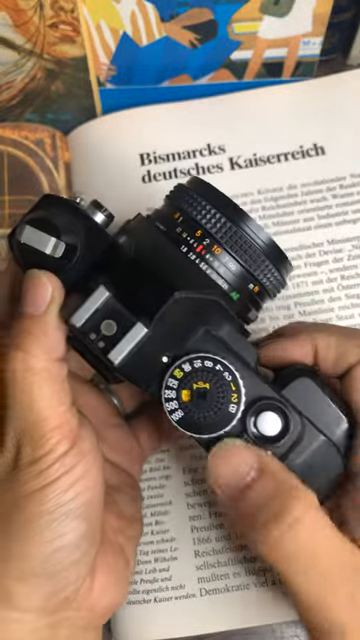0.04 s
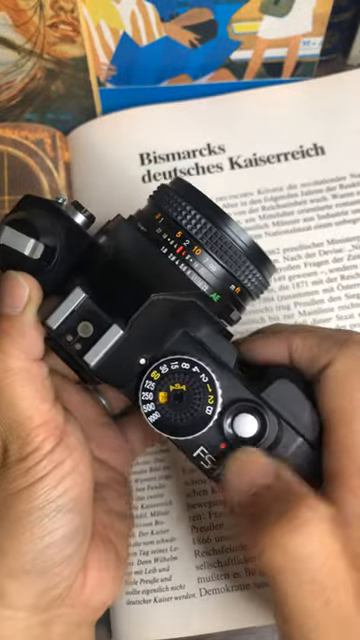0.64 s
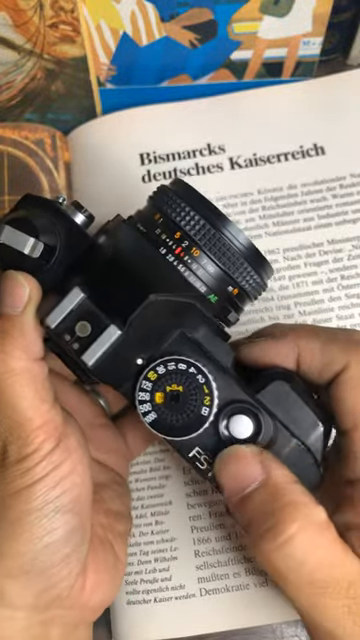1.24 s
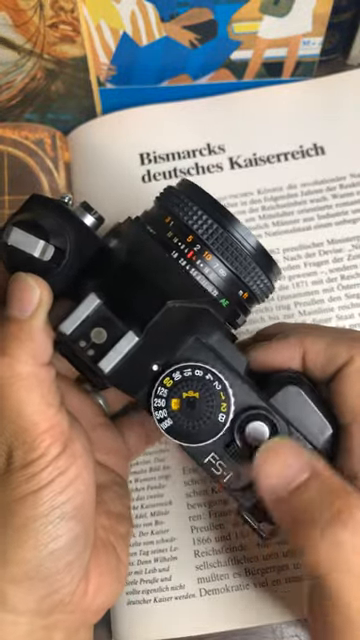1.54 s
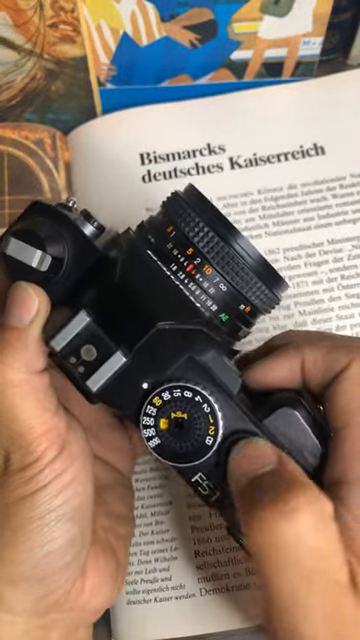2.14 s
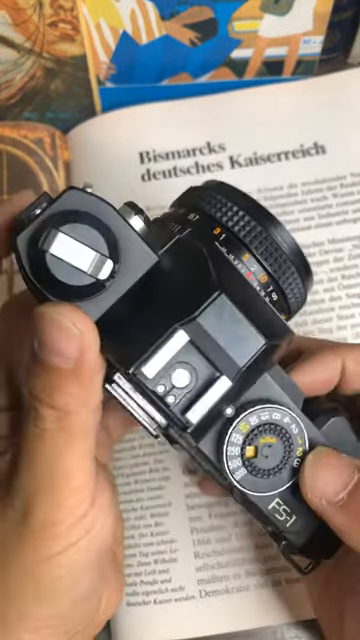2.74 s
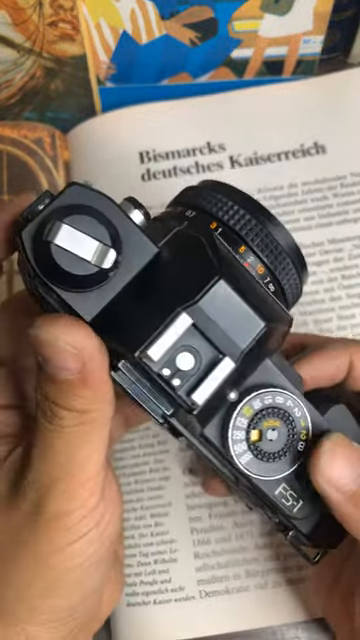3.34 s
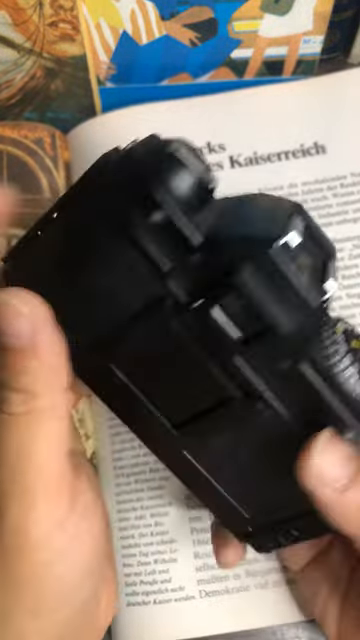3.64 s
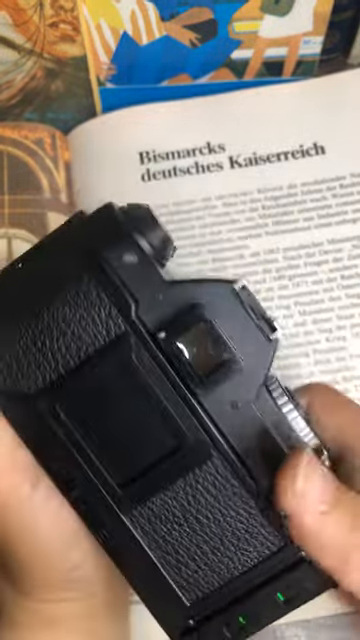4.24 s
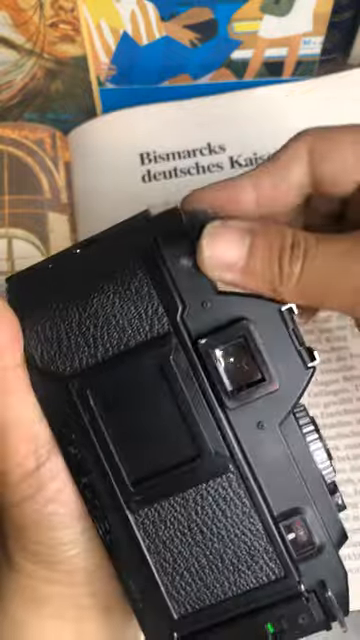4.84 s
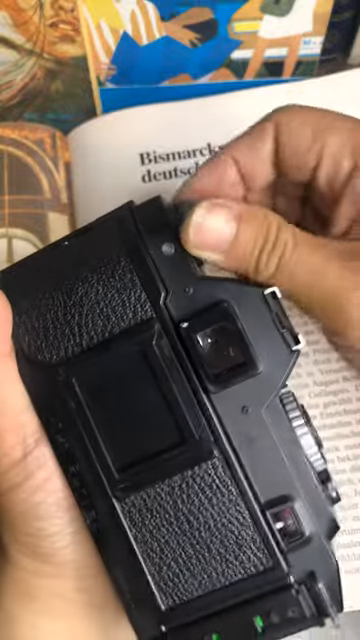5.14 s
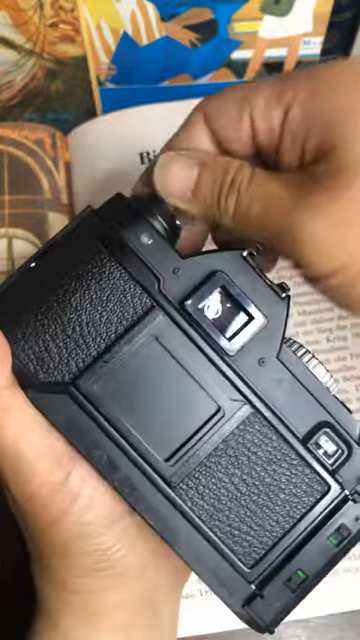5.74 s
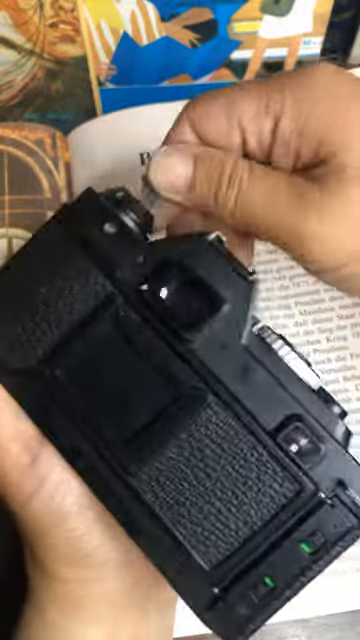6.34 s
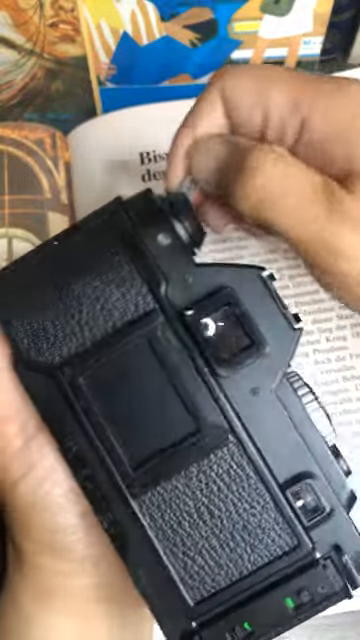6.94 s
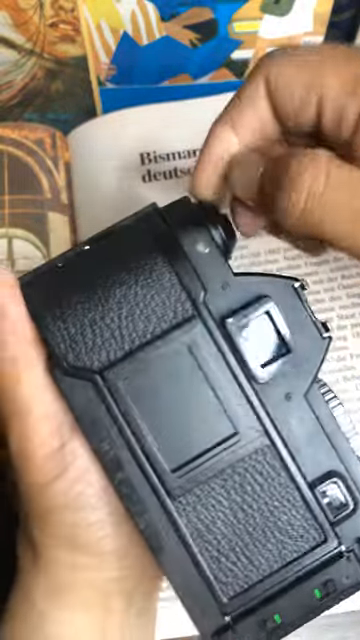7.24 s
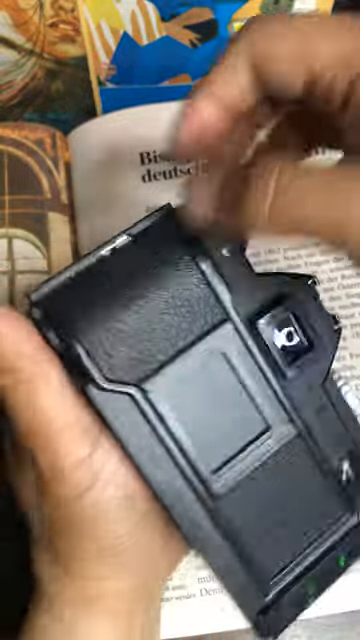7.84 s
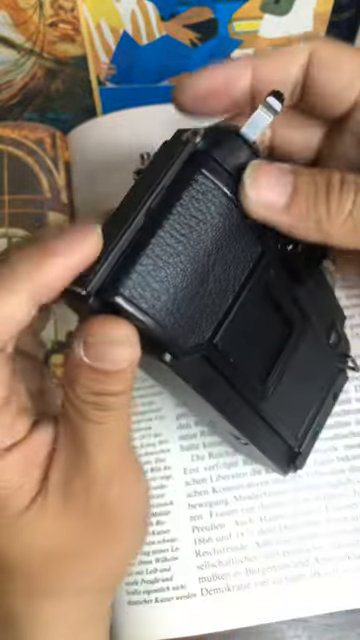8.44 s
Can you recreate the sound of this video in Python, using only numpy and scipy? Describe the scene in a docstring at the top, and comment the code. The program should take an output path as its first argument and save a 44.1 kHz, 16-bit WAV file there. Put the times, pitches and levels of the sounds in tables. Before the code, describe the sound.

Two shutter clacks, each with a short motor winder whir, followed by light clicks and finger rubs on a film camera in a quiet room.

```python
"""Small clicks and finger rubs, close to one microphone: a motorised film camera is being handled over a
book in a small room. The shutter fires twice; each time mirror and blades clack, and the geared winder
grinds under load, runs free and stops. Then the rewind knob snaps up and its crank is fiddled with.
Mains hum and faint room noise lie underneath."""
import sys
import numpy as np
from scipy import signal
from scipy.fft import rfft, irfft, next_fast_len
from scipy.io import wavfile
from scipy.ndimage import uniform_filter1d, map_coordinates

SR = 44100
rng = np.random.default_rng(int(sys.argv[2]) if len(sys.argv) > 2 else 0)


def wav_record(signal):
    """Record a signal, one row per channel, as 16-bit PCM in the file named by sys.argv[1]."""
    frames = np.transpose(np.atleast_2d(signal))
    bounded = np.clip(frames, -1, 1)
    # unit amplitude maps onto the largest positive 16-bit level
    quanta = np.round(bounded * 32767).astype(np.int16)
    wavfile.write(sys.argv[1], SR, quanta)


N = 377937
LEAD = 128  # samples of silence ahead of each contact

# The two shots. Each row: release in seconds, extra whine at standstill in dB, extra rattle brightness
# at full speed in dB.
RELEASES = [(1.7895, -6, -1), (2.9739, 5, 1.5)]
# Mirror, blades, cams and end stop striking. Each row: seconds after release, then relative level,
# knock and brightness in dB.
SHUTTER_BLOWS = [(-.014, -40, -18.5, -1.5), (0, -20.5, -23, 3.5), (.017, -25, -19.5, 8),
                 (0.0231, -18.5, -12.5, -1.5), (0.0622, -30, -14.5, 4.5), (0.065, -27, -13, -2),
                 (0.0734, -24.5, -14, 1), (.089, -27.5, -10.5, 1.5), (.1086, -32.5, -6, -13),
                 (0.1516, -28, -15, 0.5), (.156, -26.5, -16.5, 3), (0.212, -26.5, -17, 7),
                 (.2214, -21, -24.5, 3.5), (0.2364, -24.5, -23.5, 5), (0.3109, -24, -17, -0.5),
                 (.329, -34.5, -5, 2), (0.5285, -26, -18, 1.5)]
# Mirror box and shutter frame ringing. Each row: pitch in Hz, width in Hz, gain in dB.
FRAME_MODES = [(404, 22, 0), (1119, 89, -4), (1556, 95, -6), (2070, 120, -2.5), (3370, 230, -7),
               (4360, 330, -4), (7900, 160, -3), (10200, 88, -6.5), (13110, 200, -12)]
def shutter(gain_db, t60):
    """Mirror, blades and cams slam home inside their frame, in the same order at every release."""
    out = np.zeros(N)
    for release, *_ in RELEASES:
        for delay, db, knock_db, bright_db in SHUTTER_BLOWS:
            clack = contact(FRAME_MODES, db, knock_db, bright_db, t60, crack=0.38, crack_t60=0.0054,
                            rise=0.022, shape=1.17, knock_life=1.7, low_hz=380, softness=0.32)
            add(out, release + delay - LEAD / SR, clack)
    return amp(gain_db) * out


# The winder starts, slows as it cocks the springs, runs free and is braked. Each row: seconds after
# release, tooth rate in Hz, then relative whine, rattle and rattle brightness in dB.
WINDER_RUN = [(.011, 900.3, -62.5, -43.5, 0), (.052, 1196, -61, -49.5, -6), (.1, 1901, -58, -40.5, -9),
              (.139, 2386, -57, -42, -11), (.171, 2459, -47.5, -37, 3), (.221, 2034, -32.5, -35, -0.5),
              (.266, 1849, -34, -36.5, 2.5), (.316, 2019, -43.5, -34.5, 3), (.346, 2150, -45, -44.5, -15),
              (.395, 2454, -35.5, -46, -1.5), (.445, 2669, -32.5, -42, 5), (.527, 2760, -36, -48, 3.5),
              (.556, 1698, -45, -41.5, -23)]
# Partials of the whine. Each row: multiple of the tooth rate, relative level in dB.
TOOTH_PARTIALS = [(.5, -4), (1, 0), (2, -4), (3, -5)]
# The gear housing ringing. Each row: pitch in Hz, width in Hz, gain in dB.
HOUSING_MODES = [(2070, 110, -4.5), (2790, 250, 0.5), (4690, 500, 0.5), (5590, 400, -0.5), (7070, 800, 0.5)]
# Wheels and plates of the gear train ringing. Each row: pitch in Hz, width in Hz, gain in dB.
WHEEL_MODES = [(1928, 86, 1.5), (2500, 120, -6.5), (3553, 300, 1.5), (4530, 160, -7), (6630, 260, -6),
               (12900, 360, -0.5)]
# Colour of the gear rattle. Each row: frequency in Hz, relative level in dB.
RATTLE_SPECTRUM = [(200, -19.5), (600, -11.5), (850, -1.5), (1400, -0.5), (4000, -1), (10000, -3),
                   (16000, -5.5)]
def winder(jitter, throb, flutter_db, rattle_throb, whir_db, whine_gain_db, rattle_gain_db):
    """Meshing teeth whine through the housing, slower under load; the gears rattle with every turn."""
    out = np.zeros(N)
    times, *columns = np.transpose(WINDER_RUN)
    t = np.arange(times[0], times[-1], 1 / SR)
    n = len(t)
    tooth_hz, whine_db, rattle_db, bright_db = [np.interp(t, times, column) for column in columns]
    slack = (tooth_hz / tooth_hz.max()) ** 2  # unloaded gears wander in their backlash
    housing = lambda hz: sum(resonances([mode], hz) ** 2 for mode in HOUSING_MODES) / (1 + hz / 3000)
    wheels = lambda hz: amp(along(RATTLE_SPECTRUM, hz)) * (1 + resonances(WHEEL_MODES, hz))
    for release, load_db, free_bright_db in RELEASES:
        phase = 2 * np.pi * np.cumsum(tooth_hz * (1 + jitter * slack * wobble(1400, n))) / SR
        turn = np.sin(phase / 13)  # a pinion of thirteen teeth
        whine = np.zeros(n)
        for k, db in TOOTH_PARTIALS:  # each swells as it sweeps through a resonance
            boost = np.abs(resonances(HOUSING_MODES, k * tooth_hz))
            whine += amp(db + flutter_db * wobble(300, n)) * boost * np.sin(k * phase)
        whir = unit(filtered(rng.standard_normal(n), housing))  # uneven strikes ring the housing
        gears = (amp(whine_gain_db) * whine + amp(whir_db) * slack * whir) * (1 + throb * turn)
        gears *= amp(whine_db + load_db * (1 - slack))
        impacts = grains(n, rate=2400, spread_db=-0.5, smooth=0.7) * (1 + rattle_throb * turn)
        rattle = brighten(unit(filtered(impacts, wheels)), bright_db + free_bright_db * slack)
        add(out, release + times[0], gears + amp(rattle_db + rattle_gain_db) * rattle)
    return out


# Clicks under the fingers, close to the microphone. Each row: start in seconds, part, relative level
# in dB, brightness in dB.
CLICKS = [(.334, "body", -49, -4.5), (0.375, "lock", -34.5, 13), (.6285, "switch", -53.5, -6),
          (0.9543, "catch", -57, -11), (1.155, "switch", -49.5, -11), (1.2336, "switch", -33.5, -4),
          (1.5641, "switch", -45, -21), (2.934, "crank", -50, -13), (3.612, "switch", -47, -10.5),
          (3.688, "grip", -44.5, -2.5), (4.0525, "body", -33, -10.5), (4.0694, "body", -39.5, -23),
          (4.3083, "body", -40, -6), (4.6155, "crank", -48, -9), (4.7416, "crank", -52, -8),
          (4.8387, "hinge", -54, -5.5), (4.9557, "crank", -41.5, 0), (5.053, "crank", -45.5, -5.5),
          (5.2231, "catch", -52.5, -14.5), (5.6771, "knob", -20.5, 4.5), (5.761, "switch", -43, -8),
          (5.866, "shaft", -38.5, -8), (6.0042, "grip", -51, -8), (6.0309, "crank", -49, -11),
          (6.2471, "crank", -42, -7.5), (6.3057, "grip", -47.5, -3.5), (6.4004, "hinge", -50, -2.5),
          (6.465, "crank", -47, -18), (6.9282, "hinge", -39, -7), (6.945, "grip", -51, -13),
          (7.1701, "catch", -41, -0.5), (7.4675, "crank", -45, -30), (7.6975, "crank", -37, -1),
          (7.7273, "hinge", -49, 2), (7.7803, "crank", -45, -6.5), (7.9316, "crank", -38.5, -13),
          (7.981, "crank", -32.5, -17.5), (7.9961, "grip", -45, -3), (8.0455, "grip", -42.5, -8),
          (8.1163, "grip", -41.5, -5.5), (8.2198, "grip", -45.5, 1)]
# The parts that click. Each entry: ring in Hz, decay (t60) in seconds, knock in dB.
CLICKING_PARTS = {"lock": (12700, .0094, -12.5), "knob": (5600, .012, -23), "switch": (4130, .02, -15),
                  "body": (4000, .042, -11), "grip": (2950, .03, -7), "catch": (2520, .023, -18),
                  "shaft": (4620, .07, -13), "crank": (1920, .023, -12), "hinge": (1570, .04, -1)}
# The camera shell ringing. Each row: pitch in Hz, width in Hz, gain in dB.
SHELL_MODES = [(805, 230, -6), (1110, 76, -4), (1989, 170, 0), (2480, 99, 2.5), (4040, 760, -6.5),
               (6760, 3300, -2.5)]
def controls(gain_db, ring_db, ring_width, crack):
    """Each touched part adds its own ring to that of the shell; bright clicks crack hardest."""
    out = np.zeros(N)
    for start, part, db, bright_db in CLICKS:
        ring_hz, t60, knock_db = CLICKING_PARTS[part]
        modes = SHELL_MODES + [(ring_hz, ring_width * ring_hz, ring_db)]
        click = contact(modes, db, knock_db, bright_db, t60, crack=crack * amp(bright_db / 2),
                        crack_t60=0.0045, rise=0.017, shape=0.97, knock_life=1.0, low_hz=546,
                        softness=0.59)
        add(out, start - LEAD / SR, click)
    return amp(gain_db) * out


def contact(modes, db, knock_db, bright_db, t60, crack, crack_t60, rise, shape, knock_life, low_hz,
            softness):
    """Small parts meet with a sharp crack and a brief chatter, coloured by the modes of the body."""
    t = np.maximum(np.arange(-LEAD, SR // 12) / SR, 0)
    onset = 1 - np.exp(-t / (rise * t60))  # long contacts also build up slowly
    chatter = lambda life: onset * np.exp(-(np.log(1000) * t / life) ** shape)
    snap = crack * amp(-60 * t / crack_t60) * (t > 0)
    tilt = lambda hz: amp(softness * min(bright_db, 0) * np.log2(1 + hz / 2000))  # soft means dull

    def struck(envelope, edges_hz):
        ringing = filtered(burst(envelope), lambda hz: tilt(hz) * (1 + resonances(modes, hz)))
        return unit(bandpass(ringing, edges_hz))

    knock = struck(chatter(knock_life * t60), [low_hz, 1300])
    clack = struck(chatter(t60) + snap / 2, [1400, 6500])
    tick = struck(chatter(t60) + snap, [6600, 16500])
    return amp(db) * (amp(knock_db) * knock + clack + amp(bright_db) * tick)


# The rewind shaft and its spring ringing. Each row: pitch in Hz, width in Hz, gain in dB.
SHAFT_MODES = [(2100, 500, -6), (4150, 390, 0), (5577, 110, 4.5), (7014, 500, -4.5), (8689, 600, -3),
               (10400, 820, -4.5), (13290, 2000, -10.5)]
def rewind_knob(start, level_db, t60):
    """The knob snaps up, and its sprung shaft buzzes briefly against the stop."""
    out = np.zeros(N)
    t = np.arange(SR // 4) / SR
    buzz = unit(filtered(rng.standard_normal(len(t)), lambda hz: resonances(SHAFT_MODES, hz)))
    add(out, start, amp(level_db - 60 * t / t60) * buzz)
    return out


# Fingers sliding on the body. Each row: centre and half length in seconds, level and brightness in dB.
SLIDES = [(0.086, 0.017, -58, 7.5), (0.221, .025, -67.5, 5.5), (0.599, .03, -63.5, -1),
          (1.014, .015, -63, -6.5), (1.65, 0.015, -59.5, -24), (3.856, 0.07, -63.5, 1.5),
          (3.98, 0.056, -58.5, 5.5), (4.082, 0.031, -53.5, 3.5), (4.164, .03, -63, -3),
          (4.3, 0.026, -54, -2.5), (4.501, 0.083, -64, 3), (7.224, 0.018, -61.5, -4),
          (8.075, 0.053, -51.5, 3.5), (8.177, .05, -54.5, -0.5)]
# Colour of skin on leatherette. Each row: frequency in Hz, relative level in dB.
SKIN_SPECTRUM = [(300, -21.5), (900, 1), (2000, 1.5), (4500, -0.5), (8000, -2), (15000, -5)]
# The hollow camera back ringing. Each row: pitch in Hz, width in Hz, gain in dB.
BACK_MODES = [(1960, 250, -2), (3070, 360, 4), (4130, 150, -2), (5000, 360, -4), (5896, 360, -4.5)]
def fingers(slip_lag_s, slip_half_s, slip_db):
    """Skin catches and slips on the leatherette, in slides and a little at every click."""
    out = np.zeros(N)
    click_slips = [(start + slip_lag_s, slip_half_s, slip_db, 0) for start, *_ in CLICKS]
    for centre, half, db, bright_db in SLIDES + click_slips:
        t = np.arange(-2 * half, 2 * half, 1 / SR)
        catches = grains(len(t), rate=900, spread_db=8, smooth=0.81)
        squeak = [(rng.uniform(2600, 6000), 350, 1)]  # each grip squeaks at its own pitch
        colour = lambda hz: amp(along(SKIN_SPECTRUM, hz)) * (0.87 + resonances(BACK_MODES + squeak, hz))
        rub = brighten(unit(filtered(catches, colour)), bright_db)
        add(out, centre + t[0], amp(db) * swell(t, half) * rub)
    return out


# The body shifting in the hands. Each row: centre and half length in seconds, level in dB, pitch in Hz.
GRIP_SHIFTS = [(.5, 0.17, -62, 133), (2.75, 0.24, -70.5, 135), (4.17, .05, -52.5, 96),
               (4.3, 0.037, -54, 70.6), (8.07, .06, -56.5, 147), (8.059, 0.039, -62, 280),
               (8.08, 0.051, -56, 510)]
def bumps():
    """The body thuds softly in the grip."""
    out = np.zeros(N)
    for centre, half, db, pitch in GRIP_SHIFTS:
        t = np.arange(-2 * half, 2 * half, 1 / SR)
        mode = [(pitch, .6 * pitch, 0)]
        thud = unit(filtered(rng.standard_normal(len(t)), lambda hz: resonances(mode, hz) ** 2))
        add(out, centre + t[0], amp(db) * swell(t, half) * thud)
    return out


# The small room dying away. Each row: frequency in Hz, decay (t60) in seconds.
ROOM_DECAY = [(400, 0.13), (1300, 0.34), (3500, 0.16), (9000, 0.18), (15000, 0.075)]
def room(x, near_db, wall_db, wall_delay):
    """Scatter from hands and desk reaches the microphone at once; the walls answer a little later."""
    hz, frame_s, spectrum = signal.stft(rng.standard_normal(SR // 2), SR, nperseg=256)
    decay = amp(-60 * frame_s / along(ROOM_DECAY, hz)[:, None])
    _, walls = signal.istft(spectrum * decay, SR, nperseg=256)
    t = np.arange(len(walls)) / SR
    walls *= np.clip((t - wall_delay) / 0.00083, 0, 1)
    near = rng.standard_normal(len(t)) * amp(-60 * t / 0.078) * (t > .002)
    answer = amp(wall_db) * walls / np.linalg.norm(walls) + amp(near_db) * near / np.linalg.norm(near)
    return x + signal.fftconvolve(x, answer)[:N]


# Mains hum in the room. Each row: frequency in Hz, relative level in dB.
HUM_TONES = [(59.2, -62), (118.4, -62.5), (290.7, -77), (344.5, -73.5), (699.8, -84.5), (748.3, -72.5),
             (877.5, -82.5)]
# Colour of the room noise. Each row: frequency in Hz, relative level in dB.
AIR_SPECTRUM = [(25, -34), (42, -21), (60, -12.5), (84, -18.5), (105, -8.5), (128, -6.5), (200, -13),
                (300, -17), (600, -23), (800, -21), (2160, -32), (6000, -39.5), (12500, -45),
                (16000, -41.5)]
def room_tone(air_db, hum_db, waver_db):
    """An appliance hums, slightly unsteady, over dull room noise."""
    t = np.arange(N) / SR
    hum = np.zeros(N)
    for hz, db in HUM_TONES:
        hum += amp(db + waver_db * wobble(6, N)) * np.sin(2 * np.pi * hz * t + .25 * wobble(5, N))
    air = unit(filtered(rng.standard_normal(N), lambda hz: amp(along(AIR_SPECTRUM, hz))))
    return amp(hum_db) * hum + amp(air_db) * air


def amp(db):
    """Decibels to gain."""
    return 10 ** (np.asarray(db) / 20)


def unit(x):
    """Scale to rms 1."""
    return x / np.sqrt(np.mean(x ** 2) + 1e-20)


def along(points, hz):
    """Interpolate (Hz, value) points on a log frequency axis."""
    knots_hz, values = np.transpose(points)
    return np.interp(np.log(hz + 1), np.log(knots_hz + 1), values)


def filtered(x, response):
    """Multiply the spectrum of x by response(hz)."""
    n = x.shape[-1]
    padded = next_fast_len(n + 4096)
    return irfft(rfft(x, padded) * response(np.fft.rfftfreq(padded, 1 / SR)), padded)[..., :n]


def resonances(modes, hz):
    """Causal response of (Hz, width, dB) modes."""
    return sum(amp(db) * 1j * hz * width / (pitch ** 2 - hz ** 2 + 1j * hz * width)
               for pitch, width, db in modes)


def bandpass(x, edges_hz):
    """A causal band filter."""
    return signal.sosfilt(signal.butter(3, edges_hz, "bandpass", fs=SR, output="sos"), x)


def brighten(x, db):
    """Raise or lower the treble above 6500 Hz."""
    treble = filtered(x, lambda hz: 1 / (1 + (6500 / (hz + 1)) ** 6))
    return x + (amp(db) - 1) * treble


def wobble(rate, n):
    """A smooth random curve, rate knots a second."""
    return map_coordinates(rng.standard_normal(int(n * rate / SR) + 4), [np.arange(n) * rate / SR])


def swell(t, half):
    """A soft rise and fall around time zero."""
    return np.exp(-(t / half) ** 2)


def grains(n, rate, spread_db, smooth):
    """Tiny impacts of uneven size over a smooth hiss."""
    hits = (rng.random(n) < rate / SR) * rng.choice([-1, 1], n)
    sizes = amp(spread_db * rng.uniform(-1, 1, n))
    return unit(unit(hits * sizes) + smooth * rng.standard_normal(n))


def burst(envelope):
    """A noise burst with its spectrum evened out."""
    spectrum = rfft(envelope * rng.standard_normal(len(envelope)))
    power = np.abs(uniform_filter1d(np.abs(spectrum) ** 2, size=70))
    return irfft(spectrum / np.sqrt(power + 1e-20), len(envelope))


def add(track, start, x):
    """Mix x into the track from start seconds."""
    i = max(round(start * SR), 0)
    track[i:i + len(x)] += x[:len(track) - i]


def scene():
    """The camera close to one microphone, the small room behind it."""
    handling = controls(gain_db=-15.5, ring_db=7.0, ring_width=.17, crack=1.8)
    handling += rewind_knob(start=5.678, level_db=-35.5, t60=0.22)
    handling += fingers(slip_lag_s=.012, slip_half_s=.033, slip_db=-69) + bumps()
    shots = winder(jitter=.019, throb=0.31, flutter_db=3.5, rattle_throb=0.22, whir_db=-4.0,
                   whine_gain_db=-1, rattle_gain_db=2.5)
    shots += shutter(gain_db=-16.5, t60=0.026)
    camera = room(handling, near_db=-17.5, wall_db=-18.5, wall_delay=0.011)
    camera += room(shots, near_db=-13.5, wall_db=-18.5, wall_delay=0.0061)
    return (camera + room_tone(air_db=-61.5, hum_db=3.0, waver_db=1.5))[None]


def record(dry):
    """The treble ends steeply at 15900 Hz."""
    return filtered(dry, lambda hz: 1 / np.sqrt(1 + (hz / 15900) ** 160))


dry = scene()
out = record(dry)
wav_record(out)
```